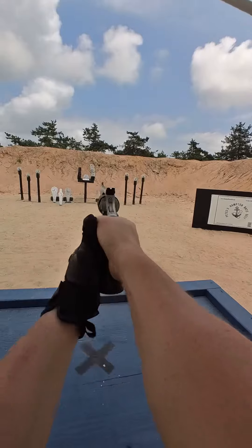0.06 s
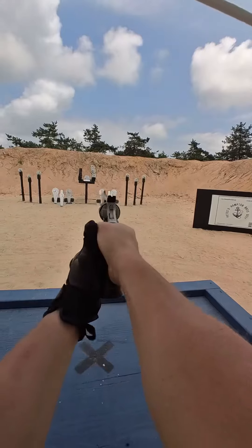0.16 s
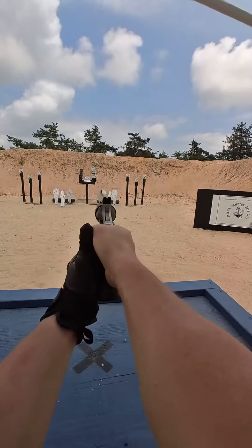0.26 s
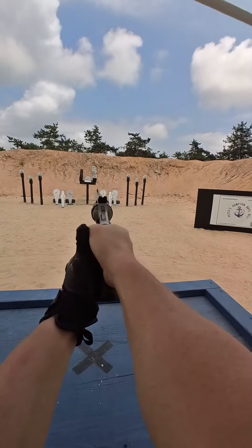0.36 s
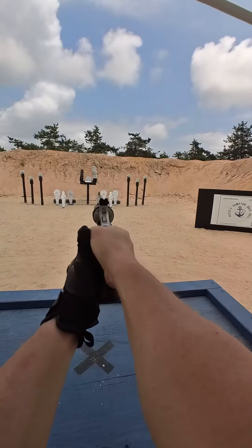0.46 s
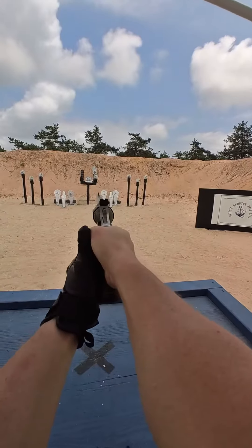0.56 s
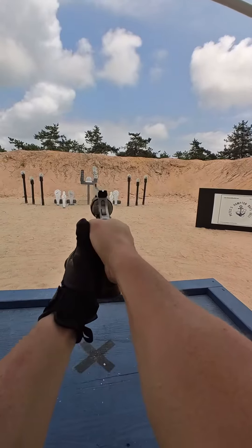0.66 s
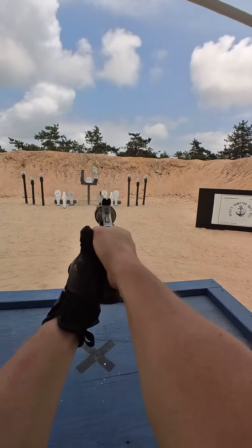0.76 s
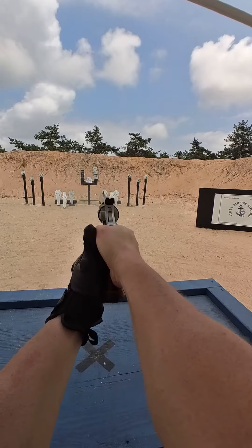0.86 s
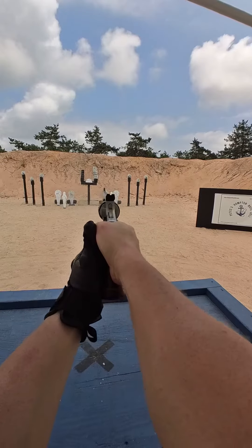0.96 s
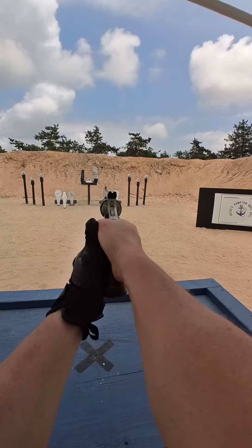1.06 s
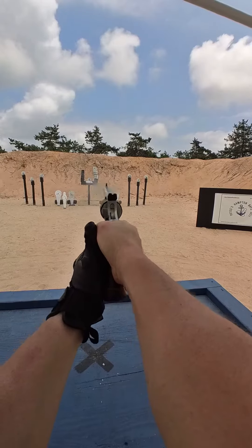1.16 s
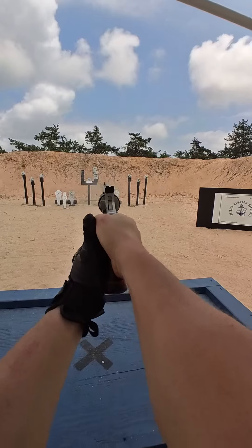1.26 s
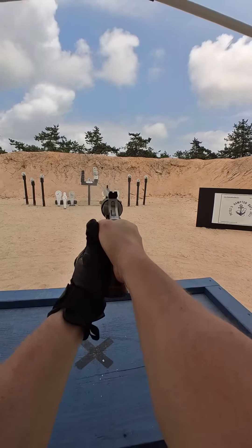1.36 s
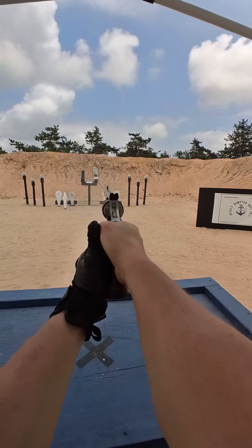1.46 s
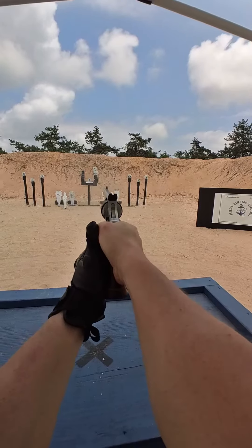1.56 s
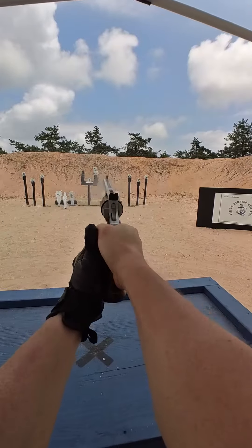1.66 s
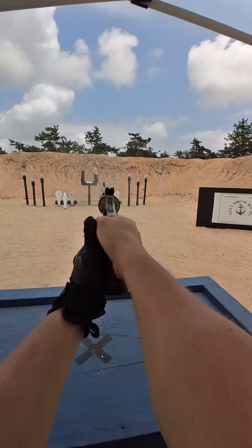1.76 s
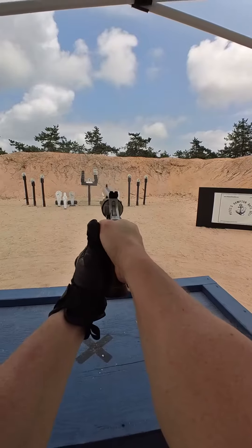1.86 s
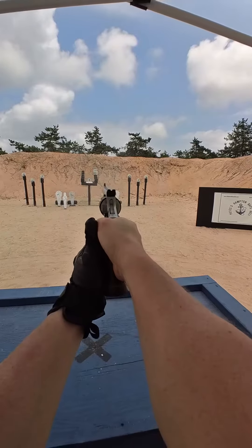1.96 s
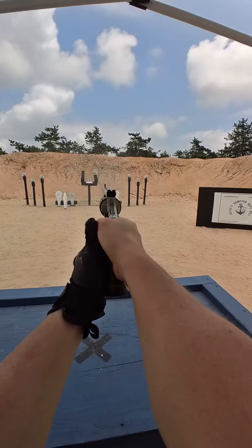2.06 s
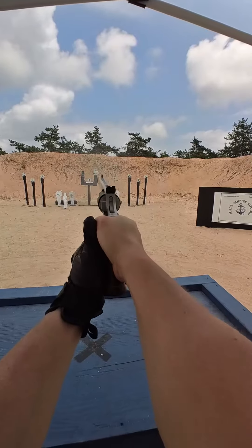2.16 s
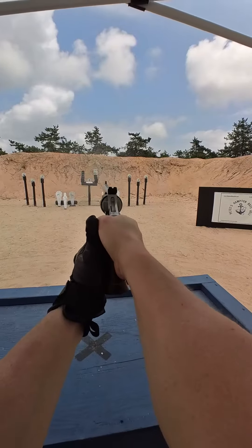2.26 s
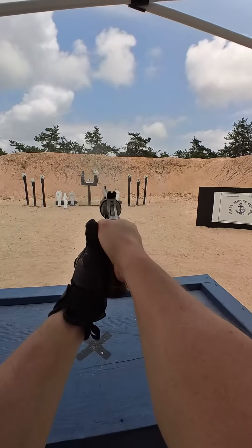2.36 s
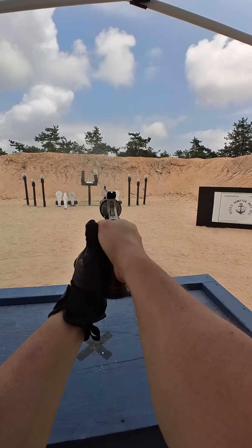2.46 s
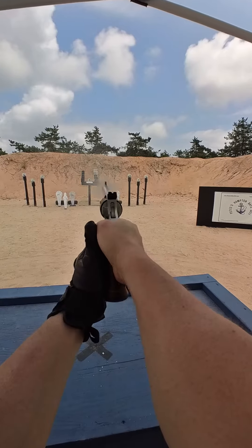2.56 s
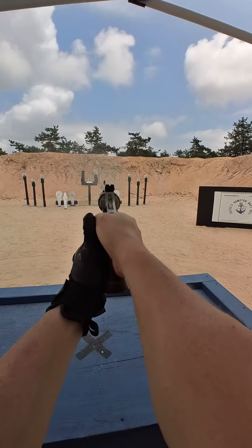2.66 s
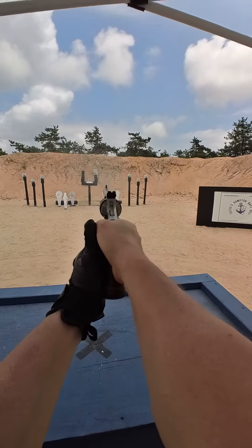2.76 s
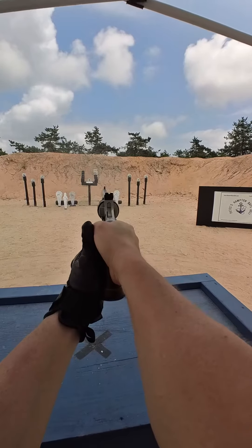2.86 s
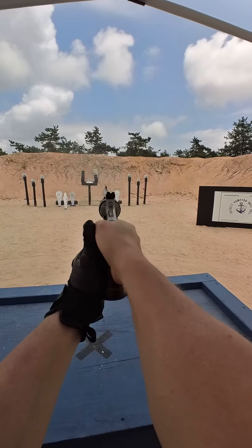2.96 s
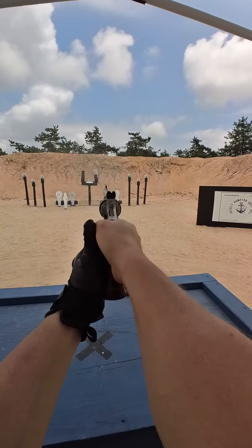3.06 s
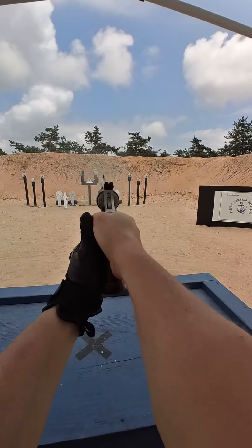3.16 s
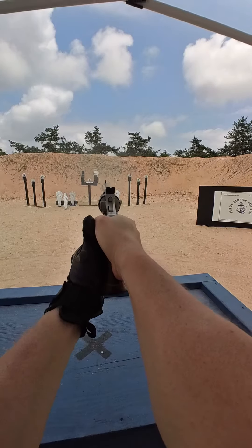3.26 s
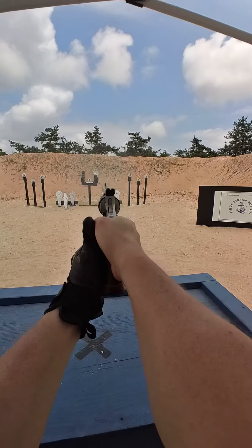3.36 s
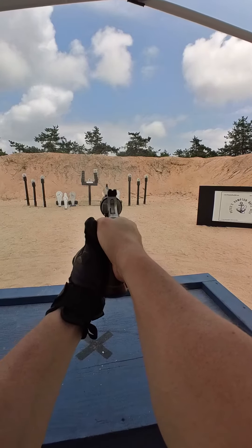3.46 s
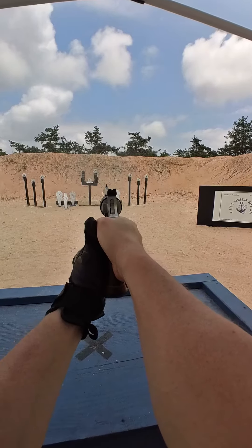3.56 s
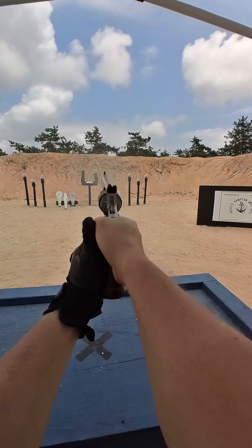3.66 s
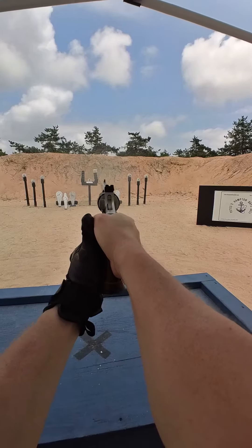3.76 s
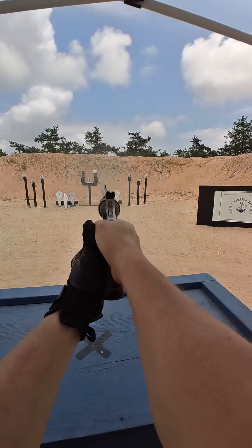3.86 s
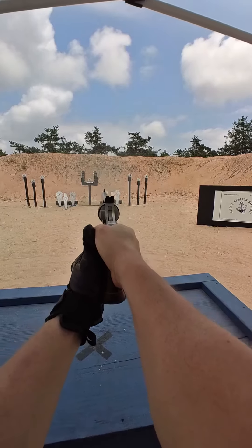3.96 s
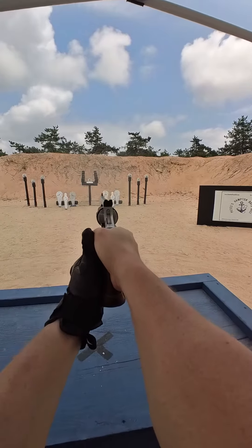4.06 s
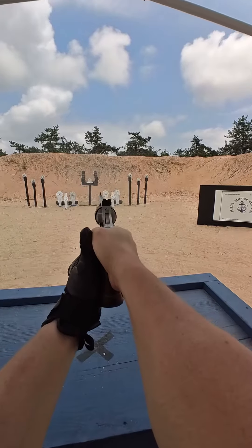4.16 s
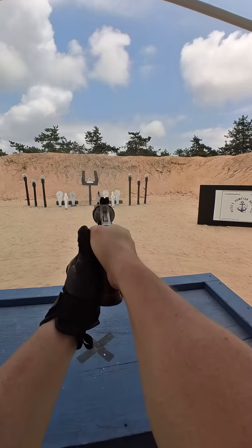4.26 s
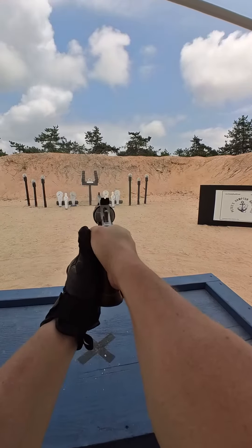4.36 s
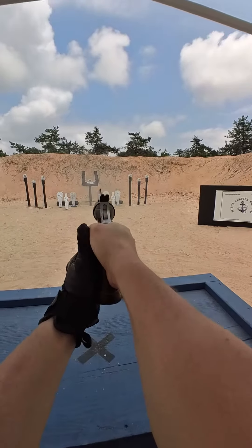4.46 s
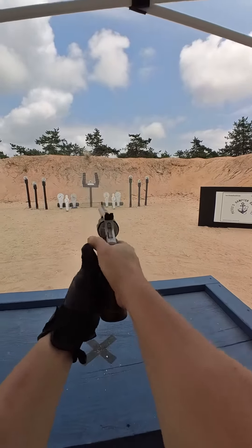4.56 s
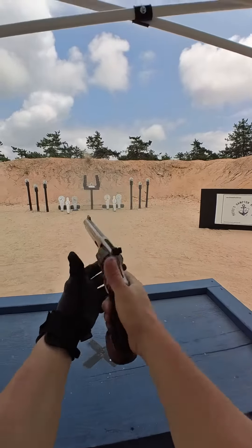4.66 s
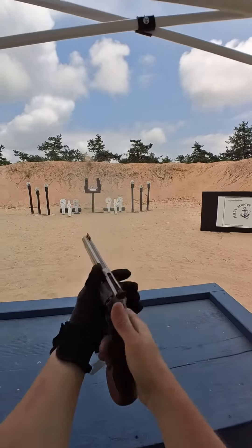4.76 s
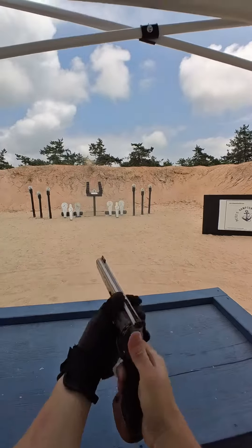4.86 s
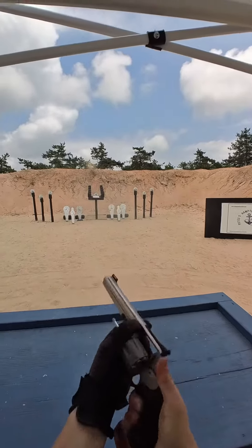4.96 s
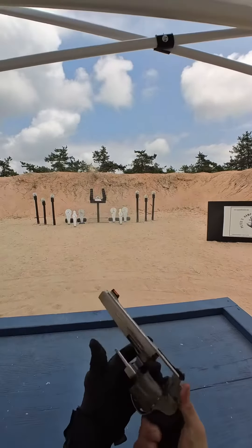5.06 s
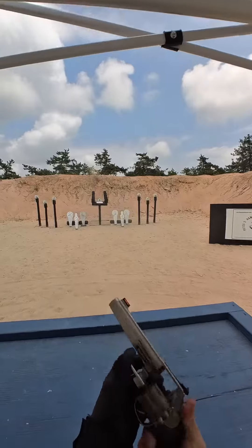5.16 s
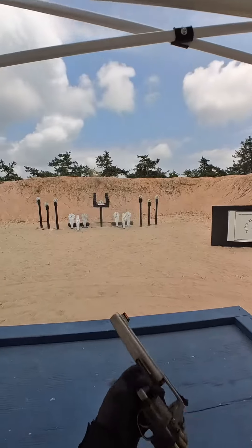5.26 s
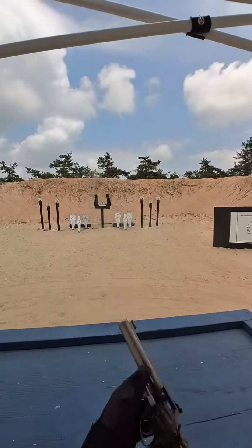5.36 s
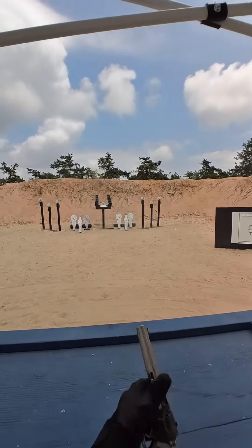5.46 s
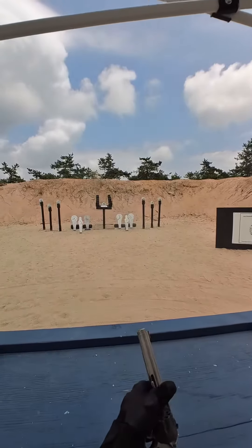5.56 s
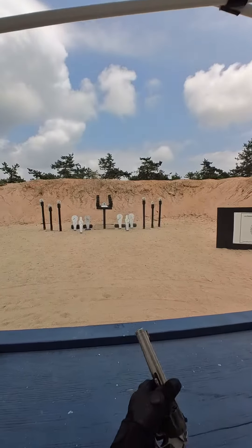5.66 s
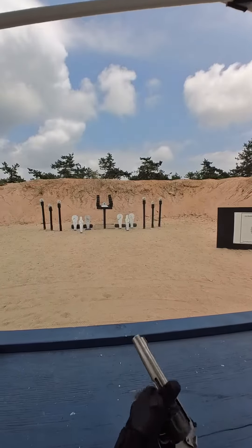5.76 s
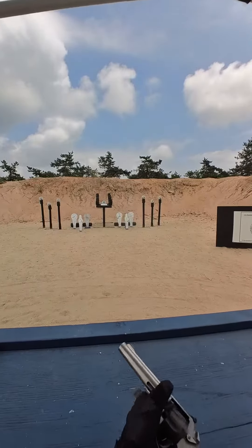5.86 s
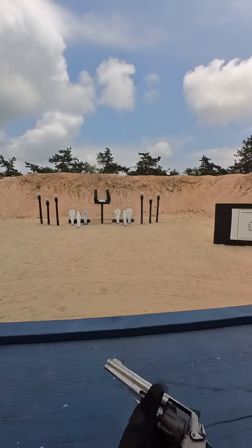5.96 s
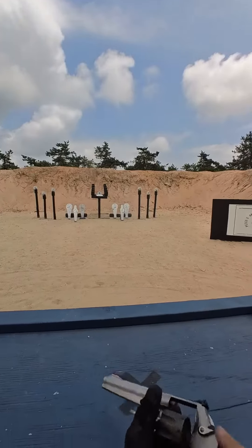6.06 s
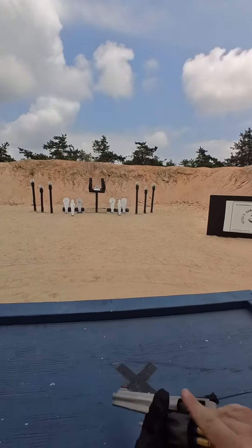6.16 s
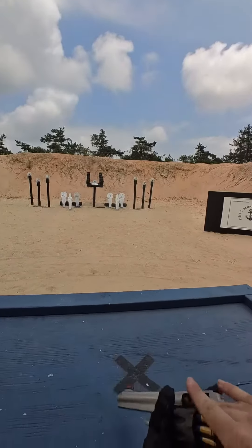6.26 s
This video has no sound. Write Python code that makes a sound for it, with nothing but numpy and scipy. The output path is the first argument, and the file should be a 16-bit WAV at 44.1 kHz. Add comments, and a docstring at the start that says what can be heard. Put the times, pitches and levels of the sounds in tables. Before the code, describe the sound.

Eight revolver shots crack across an outdoor earth-walled range, steel plates ringing and slamming down, then the gun is clicked open and knocks a table.

```python
"""An earth-walled outdoor range: a revolver fires eight shots, each a set of returns over a diffuse roll.
Six bullets splash on steel plates, sums of modes whose lobes sweep past; falling plates slam and clank.
Lock ticks precede most of the shots; clicks, scrapes and rustle are shaped noise, and at the end
the opened gun knocks on a table. Light wind lies underneath; a fast limiter squashes the blasts
in a small two-port microphone."""
import sys
import numpy as np
from scipy import signal
from scipy.fft import rfft, irfft
from scipy.io import wavfile
from scipy.ndimage import uniform_filter1d, minimum_filter1d

SR = 44100
rng = np.random.default_rng(int(sys.argv[2]) if len(sys.argv) > 2 else 0)


def waveform_to_disk(signal):
    """Save audio, clipped to [-1, 1], as 16-bit WAV at the path in sys.argv[1]."""
    frames = np.transpose(np.atleast_2d(signal))
    scaled = np.clip(frames, -1, 1) * 32767
    samples = np.round(scaled).astype(np.int16)
    wavfile.write(sys.argv[1], SR, samples)


def boost(x):
    """Linear amplitude factor 10**(x/20) for a level x in decibels (scalar or array-like)."""
    u = np.asarray(x, float) / 20
    return 10 ** u


N = 277817  # samples

# Far outdoor hush, shape of its spectrum: (frequency [Hz], relative density [dB])
HUSH_COLOUR = [(59, -20), (100, -17), (260, -19), (283, -14.5), (335, -15.5), (461, -12.5), (502, -15),
               (547, -19), (950, -21), (1130, -23.5), (16000, -62)]
HUSH_DB = -50
# Wind: (time [s], level [dB])
GUSTS = [(0.0, -40.5), (.5, -39.5), (.62, -49), (1.15, -40.5), (1.5, -53), (2.0, -46), (2.3, -53),
         (2.75, -43), (3.0, -53), (4.3, -56.5), (4.9, -51), (5.6, -44), (5.78, -32), (5.95, -42.5),
         (6.3, -50)]
# Diffuse sound at the two ports: (frequency [Hz], left-right likeness [0 to 1])
LIKENESS = [(300, 0.99), (1000, 0.94), (1700, 0.83), (2800, 0.67), (3800, 0.17), (6000, 0.12),
            (12000, 0.33)]
LEFT_LAG_S = 25e-6  # a direct sound reaches the left port this much late

# Glove and steel sliding: (time [s], level [dB], centre [Hz], rise [s], t60 [s])
SCRAPES = [(.02, -33, 5750, .03, 0.24), (1.109, -27, 2310, 0.066, 0.82), (4.98, -38, 3540, 0.017, 0.18),
           (5.101, -45.5, 3200, 0.047, 0.87), (5.19, -49, 5000, 0.059, 0.26),
           (5.248, -31, 3500, 0.031, 0.19), (5.28, -12, 4550, 0.0046, 0.047),
           (5.428, -38.5, 3000, 0.023, 0.33), (5.459, -25.5, 3300, 0.0057, 0.21),
           (5.845, -36, 2900, 0.0073, 0.3), (5.865, -26.5, 2900, 0.0034, .12),
           (6.022, -47.5, 5030, 0.015, 0.13), (6.16, -44, 5010, 0.018, 0.096),
           (6.261, -37, 3470, 0.024, 0.13)]
# Small clicks of lock, cylinder, latch and cases: (time [s], level [dB], centre [Hz])
CLICKS = [(.099, -20.5, 3100), (.155, -30.5, 2200), (.313, -40, 2420), (1.2263, -7.5, 3300),
          (2.646, -40, 2500), (2.962, -43, 2700), (3.1073, -32, 3000), (4.79, -33, 6900),
          (4.9659, -18, 2480), (4.9951, -15, 4260), (5.009, -15.5, 3600), (5.0675, -16, 3550),
          (5.1025, -8.5, 3620), (5.1156, -20, 3680), (5.125, -22, 3190), (5.2115, -25, 3580),
          (5.24, -22, 2250), (5.2788, -11.5, 3530), (5.2894, -11.5, 2900), (5.465, -15, 2560),
          (5.537, -26.5, 2600), (5.775, -24.5, 2730), (6.1589, -48, 5300), (6.227, -25, 2900),
          (6.2695, -8.5, 3470)]
CLICK_T60_S, CLICK_THUD_DB, CLICK_PAN_DB = 0.021, -23, -1.5  # pan is left minus right
# Three ticks of a trigger pull: (level [dB], centre [Hz], t60 [s], left minus right [dB])
LOCK = [(-21.5, 5600, 0.018, -4), (-12, 3940, 0.017, -4), (-7.5, 2940, 0.017, 1)]
# Trigger pulls: (first tick [s], second tick [s], third tick [s], level added to LOCK [dB])
PULLS = [(0.6193, 0.6482, .667, -1), (2.156, 2.183, 2.1964, 0), (2.592, 2.621, 2.6356, 1.5),
         (3.1164, 3.1536, 3.1759, 0), (3.661, 3.693, 3.7115, 1), (4.4039, 4.4328, 4.4474, -3)]

# Muzzle blasts: (time [s], level [dB])
SHOTS = [(0.675, -8), (1.245, -8), (1.733, -8), (2.208, -9.5), (2.648, -11), (3.192, -9.5), (3.723, -6),
         (4.461, -10)]
# Blast and its separate returns from canopy, table and berms, levels relative to the shot:
# (delay [s], level [dB], centre [Hz], t60 [s])
RETURNS = [(0, 5, 3900, 0.014), (.004, 10.5, 450, 0.027), (0.017, -14, 2820, 0.082),
           (0.034, 10.5, 2850, 0.031), (.035, 12.5, 1010, 0.048), (0.048, 10, 2900, 0.017),
           (0.05, 8.5, 910, 0.018), (0.076, -4, 930, 0.072), (.055, 5, 290, 0.056), (.1, -6.5, 400, 0.025),
           (.1, -10.5, 150, 0.11), (.16, -16, 216, 0.19), (0.121, -3, 6500, 0.014),
           (0.171, -8, 1500, 0.064)]
# Hollow returns that ring briefly on one pitch: (delay [s], level [dB], frequency [Hz], t60 [s])
BOOMS = [(.035, 13, 974, 0.054), (.052, 14.5, 955, 0.026), (.061, 6.5, 900, .04), (.095, 3.5, 917, 0.021)]
# Diffuse roll after a shot, before tilt: (delay [s], level relative to the shot [dB])
ROLL = [(0, 3.5), (.03, -6.5), (.05, -4.5), (.1, -7.5), (.18, -13.5), (.26, -25), (.39, -35.5), (.6, -45.5)]
# Shape of the roll's spectrum: (frequency [Hz], relative density [dB])
ROLL_COLOUR = [(29, -44), (50, -11), (123, -4), (273, -1), (339, -0.5), (443, 5), (525, -20.5), (852, 2),
               (1150, -1), (1420, -3), (1900, -5.5), (2500, -4), (2930, -1), (3550, -11), (4200, -7.5),
               (5380, -12.5), (11700, -31), (15200, -69), (16400, -88)]
ROLL_TILT_DB, ROLL_DULLS_DB_PER_S = 3.5, 11  # tilt per octave, and how fast that tilt sinks

# Modes, one list per plate; levels set shares within a group: (frequency [Hz], level [dB])
PLATES = [
    [(1087, -43), (1453, -56), (2239, -42.5), (2412, -44), (2692, -23.5), (2815, -35), (3354, -40),
     (4404, -41), (4780, -38), (6008, -48.5), (7515, -43.5), (10756, -48.5)],
    [(1324, -24), (1577, -39), (2126, -45), (2815, -40), (3591, -15), (4301, -33), (4538, -52), (4689, -69),
     (6686, -56), (7381, -54.5), (7763, -58.5), (8608, -67.5), (9205, -64), (9388, -59), (10078, -52),
     (10750, -56), (11073, -59), (11483, -55)],
    [(1432, -19), (2417, -37), (2670, -33), (2805, -38), (3079, -53), (3623, -4.5), (4710, -56),
     (5486, -44), (6783, -29), (7434, -35), (7704, -50), (9313, -36), (9394, -50), (10024, -59.5),
     (10368, -62), (11009, -48)],
    [(1330, -14), (1593, -13), (1960, -31), (2422, -46.5), (2859, -36), (3628, -34), (4226, -39.5),
     (4355, -31.5), (4549, -53), (4818, -48), (5679, -49.5), (6223, -49), (6525, -50), (6735, -39.5),
     (7445, -42), (9297, -43.5), (10104, -55), (10982, -60), (11208, -51), (11644, -52)],
    [(1324, -33), (1567, -28.5), (2853, -57), (3144, -43), (3569, -11.5), (4280, -30), (4457, -38),
     (6029, -48), (6708, -37.5), (7230, -51), (7607, -53), (9243, -55), (9814, -60), (10110, -63),
     (11052, -41), (11483, -46)],
    [(1044, -44), (1890, -41), (2406, -40), (2514, -80), (3085, -48), (3354, -30), (4646, -44), (4818, -53),
     (5997, -57), (8629, -58)],
]
# Upper edges of the groups of modes that share a beam: frequency [Hz]
GROUP_TOPS_HZ = [2050, 3300, 3900, 5600]
# Struck plates tip over; a level change timed ahead of the strike holds throughout:
# (strike [s], splash level [dB], time of level change [s], level change [dB], silent from [s])
FALLS = [(0.7357, 4, 1.163, -20, 2), (1.3062, 8.5, 1.65, -9, 1.658), (1.7967, 4.5, 1.89, -4.5, 2.226),
         (3.2594, 9, 3.52, -3.5, 3.7), (3.7969, 5.5, 4.105, -1.5, 4.39), (4.5204, -30, 3.7, 0.5, 4.88)]
# Lobes of each group of modes, lowest group to treble, one list per plate: (level [dB],
# strongest lobe after strike [s], time between lobes [s], fade [dB/s], left minus right [dB])
BEAMS = [
    [(-16.5, 0.058, 0.19, 177, 9.5), (-6, .08, 0.16, 208, -2), (-27, 0.054, 0.38, 114.5, 8.5),
     (-15, 0.037, 0.17, 152, -2), (-24, 0.079, 1, 127, 0)],
    [(-16.5, 0.15, 0.34, 101, 2), (-21.5, 0.089, 0.4, 149.5, 9), (-4.5, 0.15, 0.122, 2, 0.5),
     (-10.5, 0.19, 0.14, 8, 5.5), (-12, 0.01, 0.18, 88, 2.5)],
    [(-8, 0.084, 0.44, 93.5, 7.5), (-27, 0.097, 0.27, 142, 9), (-2, 0.18, 0.2, 110.5, -5),
     (-24, 0.046, .16, 247.5, -4.5), (-17, 0.12, 0.36, 146, 7.5)],
    [(-5, 0.11, 0.37, 102, 1), (-17, 0.076, 0.41, 88, 2), (-15.5, 0.2, 0.13, 60, -2),
     (-12.5, 0.12, 0.55, 72, 2), (-14.5, 0.11, 0.24, 83, 0.5)],
    [(-17.5, 0.075, 0.3, 200, 0), (-33, .08, 0.25, 99, 11), (-4, 0.2, 0.17, 87, 0.5),
     (-10, .18, 0.14, 154, -1.5), (-20, 0.094, .4, 92, -3.5)],
    [(-32, 0.12, 0.99, 105, 4), (-26, 0.1, 0.77, 198, 1.5), (-19, 0.083, 0.23, 195, 0),
     (-31.5, 0.096, 0.36, 202, 8), (-42, 0.089, 0.41, 200, -10)],
]
GAP_FILL, EARLY_FADE_SHARE = 0.35, 0.13  # gaps between lobes; fade ahead of the strongest lobe
PORT_SKEW_S = 0.0063  # the right port meets a lobe this much later
SPLASH_HZ, SPLASH_T60_S, SPLASH_THUD_DB = 3770, 0.11, -26

# Plates slamming down and bouncing: (time [s], level [dB], t60 [s], thud relative level [dB])
SLAMS = [(1.1636, -14, 0.22, -0.5), (1.173, -9, 0.22, -35), (1.6554, -7, 0.17, -14),
         (1.674, -11.5, 0.17, -11), (2.0456, -17.5, 0.19, -1.5), (2.059, -18, 0.14, -10.5),
         (3.5348, -16.5, 0.34, -8), (3.56, -17, 0.24, -12.5), (4.1046, -1.5, 0.068, -10.5),
         (4.1198, -18, 0.2, -0.5), (4.2688, -17, 0.21, -6.5), (4.287, -28.5, 0.4, -16)]
SLAM_HZ = 2900
# A falling plate meets the rack: (time [s], level [dB], frequency it excites most [Hz])
CLANKS = [(1.172, -17, 3600), (1.658, -6.5, 2120), (3.537, -7, 3350), (4.105, -17, 1960),
          (4.269, -15, 3080)]
# Modes of the rack under the plates: (frequency [Hz], relative level [dB], t60 [s])
RACK = [(1640, -6, 0.25), (2913, -3, 0.13), (3150, -12, 0.39), (4620, -6, 0.1), (4600, -7.5, .2),
        (5400, -20, 1)]

# The gun's steel tings: (time [s], level [dB])
FRAME_KNOCKS = [(5.26, -58), (5.28, -44), (5.601, -37), (5.687, -49), (6.053, -62.5)]
FRAME_HZ, FRAME_T60_S = 10070, 0.34
# Hands busy on the gun after the last shot
RUSTLE_FROM_S, RUSTLE_DB, RUSTLE_HZ, RUSTLE_PER_S = 5.5, -63, 5900, 300
# The gun meets the table: (time [s], level [dB], centre [Hz], thud relative level [dB])
KNOCKS = [(5.598, 9, 2420, -6.5), (5.691, -11, 3240, -4), (5.715, -20.5, 3260, -16), (6.053, -3, 2600, -14),
          (6.073, -26, 2150, -8), (6.289, -17, 2100, -23), (6.2934, -14, 2130, -10.5)]
KNOCK_T60_S = 0.026
# Modes of the table top: (frequency [Hz], relative level [dB], t60 [s])
TABLE = [(250, -3.5, 0.15), (400, -2, 0.15), (560, 0.5, 0.11), (815, -10, .07), (1250, -5, .05),
         (2200, -3, 0.057), (2600, -8.5, 0.081), (2940, -16, .06), (3600, -13, 0.041)]
TABLE_DB = -10.5  # added to every table mode

SIDE = np.array([[1], [-1]])  # left, right


def evened(x):
    """Normalisation: scales a signal to rms 1."""
    return x / np.sqrt(np.mean(x ** 2) + 1e-20)


def read(points, hz):
    """Interpolation of a spectrum on a logarithmic frequency axis."""
    f, value = np.transpose(points)
    return np.interp(np.log(hz + 1), np.log(f + 1), value)


def add(mix, s, sound):
    """Superposition: adds a sound to the mix at time s."""
    part = mix[..., max(round(s * SR), 0):][..., :sound.shape[-1]]
    part += sound[..., :part.shape[-1]]


def filtered(x, gain):
    """Linear filtering: multiplies the spectrum of x by gain(hz)."""
    return irfft(rfft(x) * gain(np.fft.rfftfreq(x.shape[-1], 1 / SR)), x.shape[-1])


def hump(f, hz, octaves):
    """Band-pass weighting: a Gaussian on an octave scale around hz."""
    return np.exp(-(np.log2((f + 1) / hz) / octaves) ** 2)


def burst(db, hz, t60, octaves, skirt_db, rise=0.00089):
    """Exponential decay of two unrelated noises, a hump around hz over a broad treble skirt."""
    noise = rng.standard_normal((2, 8192))
    t = np.arange(8192) / SR

    def colour(f):
        skirt = f / (f + hz) / (1 + (f / 10000) ** 4)
        return hump(f, hz, octaves) + boost(skirt_db) * skirt

    envelope = boost(db - 60 * t / max(t60, .005)) * (1 - np.exp(-t / rise))
    return envelope * evened(filtered(noise, colour))


def ring(hz, db, t60):
    """Free vibration of one damped mode, a little late at the left port."""
    t = np.arange(SR // 2) / SR
    envelope = boost(db - 60 * t / t60) * (1 - np.exp(-t / 0.00073))
    return envelope * np.sin(2 * np.pi * hz * (t - np.array([[LEFT_LAG_S], [0]])))


def knock(db, hz, t60, thud_db, thud_hz, thud_slower):
    """Impact radiation: a bright crack with a duller thud at thud_slower times its t60."""
    crack = burst(db - 4.0, hz, t60, octaves=0.86, skirt_db=-12.5)
    thud = burst(db + thud_db - 2.5, thud_hz, t60 * thud_slower, octaves=2.28, skirt_db=-38.0, rise=0.00077)
    return crack + thud


def ports(pair, direct):
    """Spatial coherence: mixes two unrelated draws so left and right are alike by frequency."""
    def same(f):
        return np.clip(direct + (1 - direct) * read(LIKENESS, f), 0, 1)

    mid = filtered(pair[0], lambda f: np.sqrt((1 + same(f)) / 2))
    apart = filtered(pair[1], lambda f: np.sqrt((1 - same(f)) / 2))
    left = filtered(mid + apart, lambda f: np.exp(-2j * np.pi * f * LEFT_LAG_S))
    return np.array([left, mid - apart])


def air():
    """Turbulence: lumpy low-frequency wind, differing at each port, over a far outdoor hush."""
    t = np.arange(N) / SR
    hush, wind, lumps = rng.standard_normal((3, 2, N))
    hush = evened(filtered(hush, lambda f: boost(read(HUSH_COLOUR, f))))
    lumps = evened(filtered(lumps, lambda f: 1 / (1 + (f / 12) ** 2)))
    shared = wind + .12 * wind[::-1]  # a little of each port's wind in the other
    wind = filtered(shared, lambda f: f / (f + 15) / (1 + (f / 70) ** 2))
    wind = evened(evened(wind) * boost(4.4 * lumps))
    wind = wind * boost(np.interp(t, *np.transpose(GUSTS)))
    return wind + ports(boost(HUSH_DB) * hush, direct=0)


def scrape(db, hz, rise, t60):
    """Sliding friction: broad noise that swells and dies."""
    return burst(db, hz, t60, octaves=1.26, skirt_db=-45, rise=rise)


def small_impacts():
    """Collision timing: lists lock ticks, clicks and table knocks in order of time."""
    impacts = []  # (time [s], level [dB], centre [Hz], t60 [s], thud level [dB], left minus right [dB])
    for *times, pull_db in PULLS:
        for s, (db, hz, t60, pan_db) in zip(times, LOCK):
            impacts.append((s, db + pull_db, hz, t60, -28, pan_db))
    for s, db, hz in CLICKS:
        impacts.append((s, db, hz, CLICK_T60_S, CLICK_THUD_DB, CLICK_PAN_DB))
    for s, db, hz, thud_db in KNOCKS:
        impacts.append((s, db, hz, KNOCK_T60_S, thud_db, 0))
    return sorted(impacts)


def small_impact(db, hz, t60, thud_db):
    """Impact and early reflection: a crack and thud, then a faint answer from table and canopy."""
    answer = burst(db - 25.0, hz, 5 * t60, octaves=0.71, skirt_db=-41.0, rise=0.0084)
    return knock(db, hz, t60, thud_db, thud_hz=400, thud_slower=4.2) + answer


def shot(db):
    """Reverberation of a blast: separate returns over a patchy diffuse roll that dulls as it dies."""
    hz, t = np.fft.rfftfreq(256, 1 / SR), np.arange(420) * 64 / SR
    a, b, c, d, patches = rng.standard_normal((420, 129, 5)).T
    patches = evened(uniform_filter1d(uniform_filter1d(patches, 6, 0), 6, 1))
    # brief wide-band random flicker makes the roll crackle
    crackle = rng.exponential(1, (420, 129)).T - 1
    crackle = evened(uniform_filter1d(crackle, 40, 0))
    pair = np.array([a + 1j * b, c + 1j * d]) * boost(read(ROLL_COLOUR, hz))[:, None]
    octaves_up = np.log2(hz / 1500 + 0.48)[:, None]
    tilt_db = octaves_up * (ROLL_TILT_DB - ROLL_DULLS_DB_PER_S * t)
    field_db = np.interp(t, *np.transpose(ROLL)) + tilt_db

    def noise(gain):
        return signal.istft(pair * gain, nperseg=256, noverlap=192)[1]

    out = noise(boost(field_db + 2.4 * patches + 1.44 * crackle)) / np.std(noise(0.96))
    for delay, return_db, centre_hz, t60 in RETURNS:
        add(out, delay, burst(return_db, centre_hz, t60, octaves=0.58, skirt_db=-19.0))
    for delay, boom_db, boom_hz, t60 in BOOMS:
        add(out, delay, ring(boom_hz, boom_db, t60))
    return boost(db) * out


def splash(db):
    """Impact of a bullet on steel: a bright crack over a weak thud."""
    return knock(db, SPLASH_HZ, SPLASH_T60_S, SPLASH_THUD_DB, thud_hz=450, thud_slower=1.2)


def beam(t, db, facing, spacing, fade_db, pan_db):
    """Directivity of a tipping plate: lobes pass in turn, weaker away from the strongest one."""
    since = t - facing + SIDE * PORT_SKEW_S / 2
    lobes = np.cos(np.pi * since / spacing) + 1j * GAP_FILL
    faded_db = fade_db * np.maximum(since, -EARLY_FADE_SHARE * since)
    return lobes * boost(db + SIDE * pan_db / 2 - faded_db)


def plate(modes, beams, strike, change, change_db, silent):
    """Modal superposition: modes struck together, each with a random waver that dies away."""
    t = np.arange(0, silent - strike, 1 / SR)
    hz, level_db = np.transpose(modes)
    power = boost(level_db) ** 2
    group = np.searchsorted(GROUP_TOPS_HZ, hz)
    share = np.sqrt(2 * power / np.bincount(group, power)[group])
    gains = [beam(t, *row) for row in beams]
    out = np.zeros((2, len(t)))
    for f, g, a, (phase, rate, start, apart, weak) in zip(hz, group, share, rng.random((len(hz), 5))):
        # the waver of low modes settles soon, that of high modes lasts
        depth = min(0.8 * f / 5000, .95) * np.exp(-t / (.14 + .6 * (f / 7000) ** 3))
        cycles = (rate - .5) * 50 * t + start + SIDE * 0.29 * apart  # differs at the two ports
        waver = 1 + depth * np.exp(2j * np.pi * cycles)
        turn = np.exp(2j * np.pi * (f * (t - SIDE * LEFT_LAG_S / 2) + phase))
        # the weaker modes of a group die at their own pace
        weak_db = -70 * weak * (1 - a ** 2 / 2) * (t - .1)
        out += a * boost(weak_db) * (gains[g] * waver * turn).real
    changed = np.clip((t + strike - change) / 0.02 + .5, 0, 1)  # over 0.02 s
    onset = np.minimum(t / 0.0045, 1)
    last_fade = np.minimum(t[::-1] / 0.09, 1)
    return out * boost(change_db * changed) * onset * last_fade


def slam(db, t60, thud_db):
    """Impact of a falling plate: a bright crack with a thud of nearly the same decay."""
    return knock(db, SLAM_HZ, t60, thud_db, thud_hz=450, thud_slower=0.98)


def clank(db, most_hz):
    """Selective excitation: rack modes ring more weakly the farther they lie from most_hz."""
    out = np.zeros((2, SR // 2))
    for hz, mode_db, t60 in RACK:
        out += ring(hz, db + mode_db - 22 * np.log2(hz / most_hz) ** 2, t60)
    return out


def frame_neighbours(db):
    """Modal clustering: a narrow noise band stands for modes beside the frame's ting; they die fast."""
    return burst(db + 16, FRAME_HZ, 0.1, octaves=0.052, skirt_db=-41, rise=0.0023)


def rustle():
    """Shot noise: fine random grains of cloth and steel over a thin hiss."""
    strength = boost(4.0 * np.minimum(rng.exponential(1, N), 4))
    grains = (rng.random(N) < RUSTLE_PER_S / SR) * strength
    decay = np.exp(-1 / (0.0046 * SR))  # each grain dies with a 4.6 ms time constant
    swell = signal.lfilter([1], [1, -decay], grains) + 0.2
    noise = filtered(rng.standard_normal((2, N)), lambda f: hump(f, RUSTLE_HZ, 1.94))
    fade_in = np.clip((np.arange(N) / SR - RUSTLE_FROM_S) / 0.064, 0, 1)
    return boost(RUSTLE_DB) * evened(noise * swell) * fade_in


def table_top(db):
    """Modal response of a struck panel: the table's damped modes ring together."""
    out = np.zeros((2, SR // 2))
    for hz, mode_db, t60 in TABLE:
        out += ring(hz, db + TABLE_DB + mode_db, t60)
    return out


def scene():
    """Superposition of far, near and ringing sources at the shooter's head."""
    far, near, lean_db, rings = np.zeros((4, 2, N))
    for s, db, hz, rise, t60 in SCRAPES:
        add(near, s, scrape(db, hz, rise, t60))
    for s, db, hz, t60, thud_db, pan_db in small_impacts():
        add(near, s, small_impact(db, hz, t60, thud_db))
        # near sounds lean this way from 99 samples ahead until the next impact
        lean_db[:, round(s * SR) - 99:] = SIDE * pan_db / 2
    for s, db in SHOTS:
        add(far, s, shot(db))
    for modes, beams, (s, splash_db, *fall) in zip(PLATES, BEAMS, FALLS):
        add(far, s, splash(splash_db))
        add(rings, s, plate(modes, beams, s, *fall))
    for s, db, t60, thud_db in SLAMS:
        add(far, s, slam(db, t60, thud_db))
    for s, db, most_hz in CLANKS:
        add(rings, s, clank(db, most_hz))
    for s, db in FRAME_KNOCKS:
        add(rings, s, ring(FRAME_HZ, db, FRAME_T60_S))
        add(near, s, frame_neighbours(db))
    for s, db, _, thud_db in KNOCKS:
        add(rings, s, table_top(db + thud_db))
    far_heard = ports(far, direct=0.017)
    near_heard = ports(near + rustle(), direct=0.53) * boost(lean_db)
    return far_heard + near_heard + rings + air()


def roll_off(x):
    """The treble ends steeply here."""
    return signal.sosfilt(signal.butter(12, 16540, fs=SR, output="sos"), x)


def record(dry):
    """Dynamic range compression: after a treble roll-off, a look-ahead limiter that recovers quickly."""
    edge_hz, recovery_db_per_s, threshold_db = 15800, 148.0, -3.0
    heard = filtered(dry, lambda f: 1 / (1 + (f / edge_hz) ** 16))
    peak_db = 20 * np.log10(abs(heard).max(0) + 1e-9)
    # hold each peak, letting it sink at the recovery rate
    fall_db = np.arange(N) * recovery_db_per_s / SR
    held_db = np.maximum.accumulate(peak_db + fall_db) - fall_db
    over_db = np.maximum(held_db - threshold_db, 0)
    # the greatest excess within 301 samples, smoothed, so the gain drops a few ms ahead
    ahead_db = -minimum_filter1d(-over_db, size=301)
    limited = heard * boost(-uniform_filter1d(ahead_db, size=301))
    return roll_off(limited)


dry = scene()
out = record(dry)
waveform_to_disk(out)
```